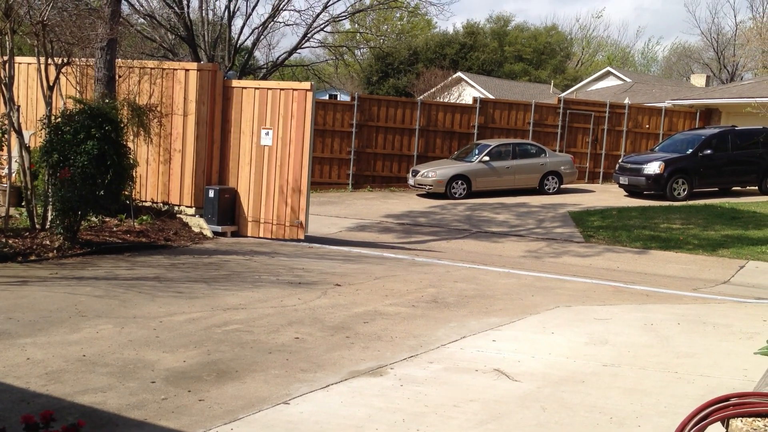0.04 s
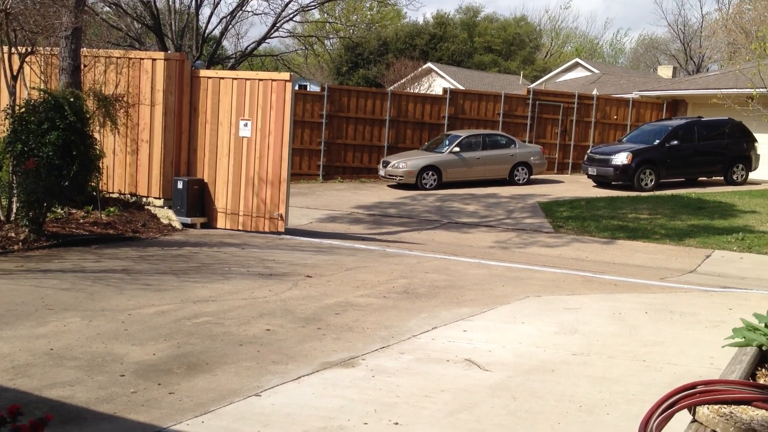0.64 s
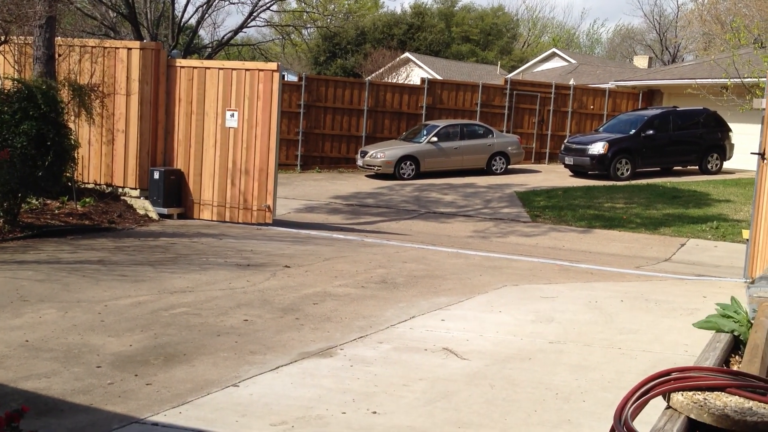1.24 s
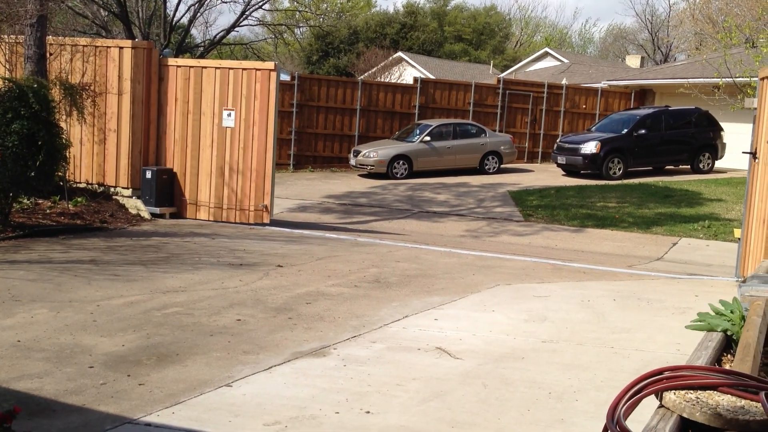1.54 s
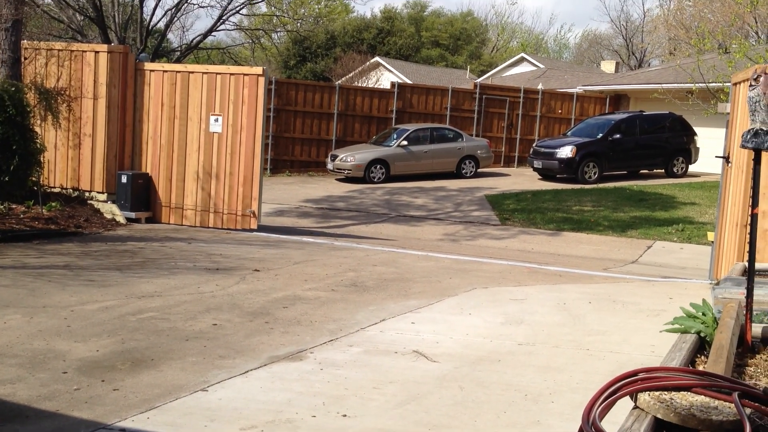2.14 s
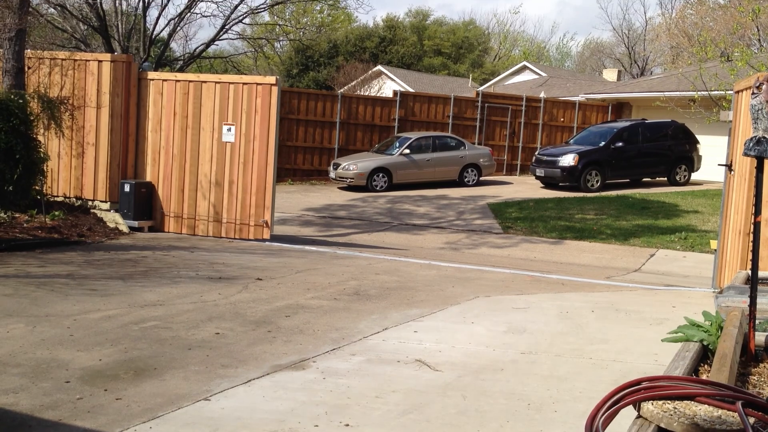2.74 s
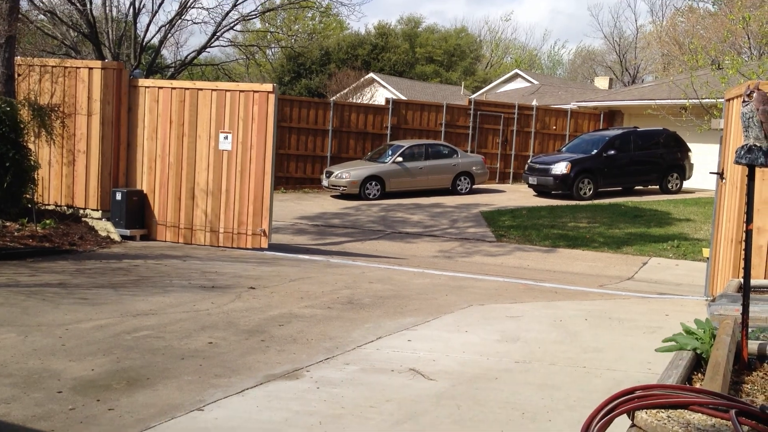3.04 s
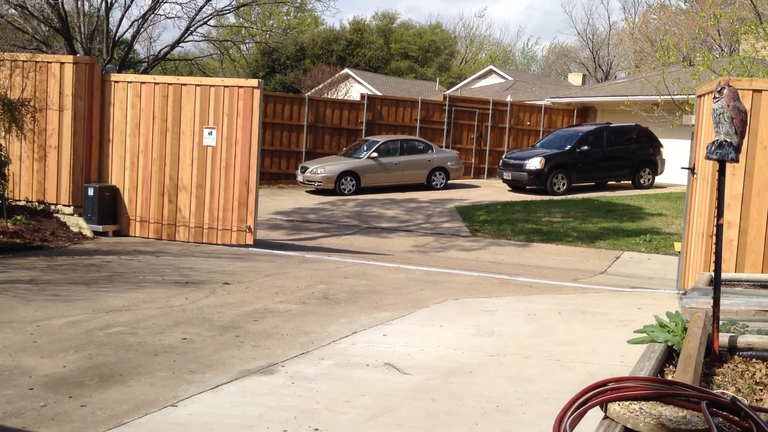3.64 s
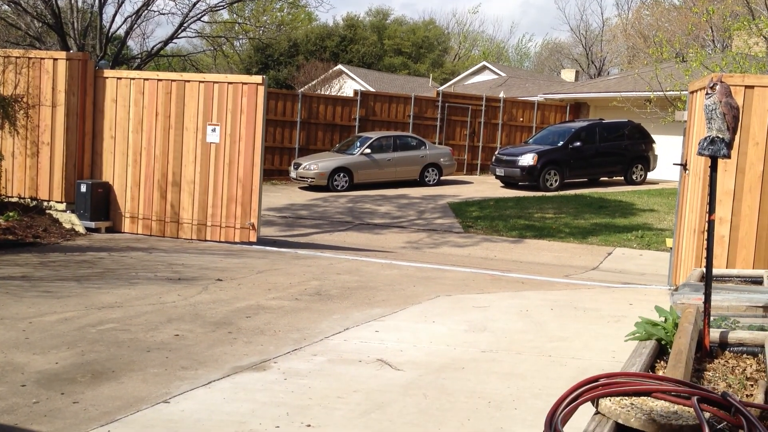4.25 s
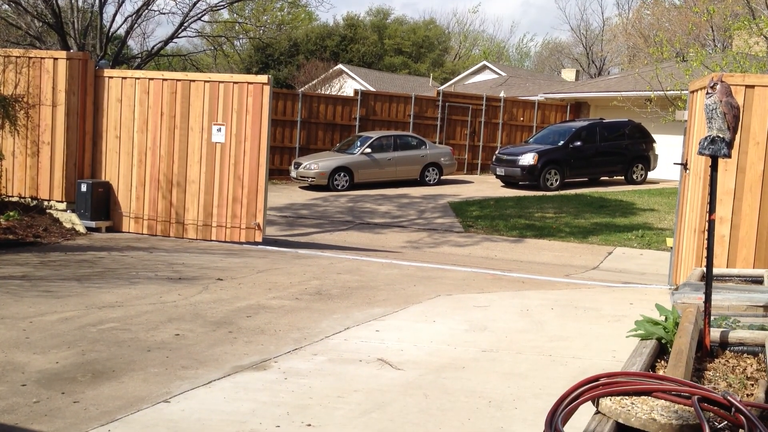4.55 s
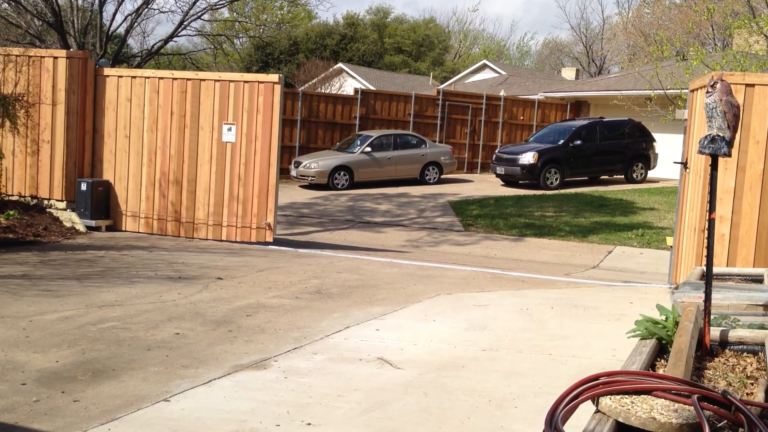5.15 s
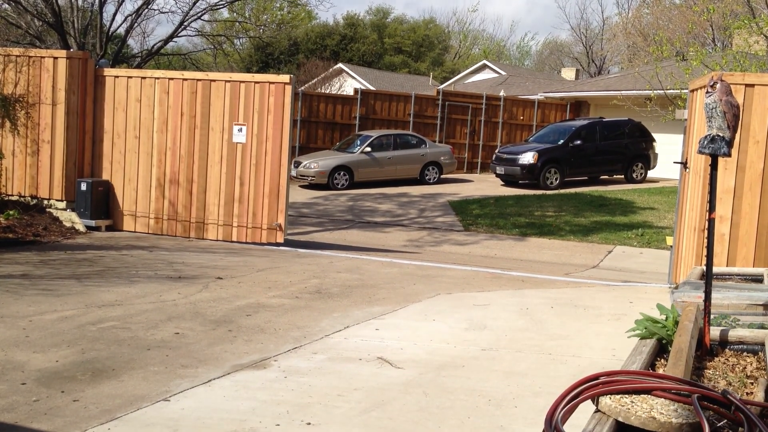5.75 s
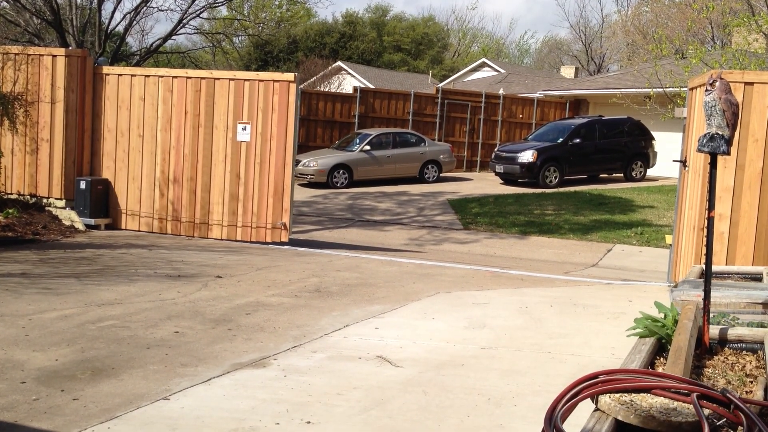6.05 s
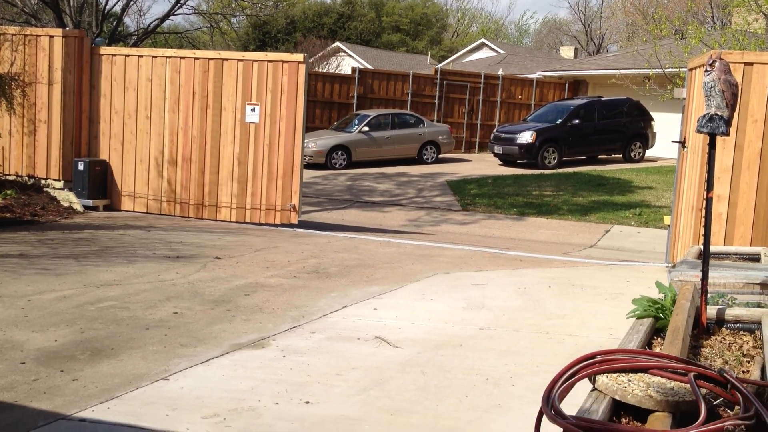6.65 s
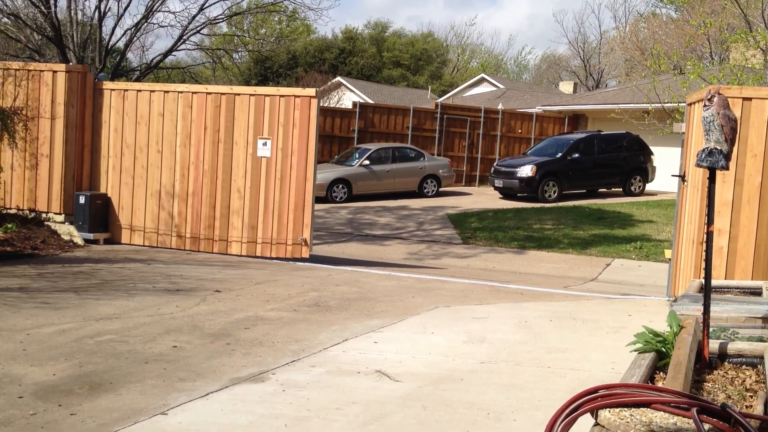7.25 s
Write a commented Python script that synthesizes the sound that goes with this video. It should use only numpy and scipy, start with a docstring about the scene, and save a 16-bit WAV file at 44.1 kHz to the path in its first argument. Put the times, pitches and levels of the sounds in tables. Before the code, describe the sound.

Wind gusts on the microphone with low thuds, then eases over distant traffic, a faint gate motor hum and small birds.

```python
"""Breeze in a driveway

Turbulent air rings the microphone port: first a gust with thuds and pops, then lighter puffs.
Beneath it a wooden gate's motor hums some way off, small birds whistle and chip, and light ticks
sound close by. Distant traffic and a fine hiss form the background. Fences and walls scatter short
echoes, and a gain control turns everything down under the gust."""
import sys
import numpy as np
from scipy import signal
from scipy.fft import rfft, irfft
from scipy.io import wavfile
from scipy.ndimage import uniform_filter1d, minimum_filter1d

SR = 44100
rng = np.random.default_rng(int(sys.argv[2]) if len(sys.argv) > 2 else 0)


def dump(signal):
    """Clip the signal to [-1, 1] and save it as 16-bit WAV at the path in sys.argv[1]."""
    limited = np.clip(np.atleast_2d(signal).T, -1, 1)
    pcm = np.round(limited * 32767).astype(np.int16)
    wavfile.write(sys.argv[1], SR, pcm)


N = 321930

# Push of the wind, two surges, a lull and two light swells: t/s, level/dB
GUST_ENVELOPE = [(0, -42), (.05, -30.5), (.15, -29), (.2, -20.5), (.33, -21.5), (.44, -27), (.57, -29),
                 (.7, -13.5), (.86, -13.5), (1.3, -29.5), (1.41, -50.5), (1.85, -43.5), (2.4, -52.5),
                 (3.95, -48.5), (4.28, -34.5), (4.75, -53.5), (5.4, -37.5), (6.25, -39), (7.3, -50)]
# Spectra of the port's low thud, of light air and of hard eddies' flutter: f/Hz, relative level/dB
THUD_SPECTRUM = [(20, -40), (45, -38), (65, -18.5), (90, -13.5), (130, -0.5), (160, 2.5), (220, 0),
                 (310, -4.5), (420, -13), (600, -27.5), (1000, -48), (2500, -76), (8000, -100)]
LIGHT_AIR_SPECTRUM = [(25, -39.5), (45, -37.5), (70, -14.5), (100, -8), (150, 2.5), (200, -2.5),
                      (280, -11.5), (400, -17.5), (700, -30.5), (4000, -79)]
FLUTTER_SPECTRUM = [(150, -27), (300, 2.5), (530, -1), (700, -7), (1000, -16.5), (1500, -29), (2200, -35.5),
                    (4000, -50), (9000, -78.5)]


def wind(gust_db=-1.5, flutter_db=-11.5, brighten=2.26, lumps_db=1.72, lumps_hz=22, crossover_db=-30):
    """Turbulent pressure fluctuations rumble, deeper in light air; flutter grows fastest in a gust."""
    push_db = curve(GUST_ENVELOPE)
    hard_share = 1 / (1 + amp(crossover_db - push_db) ** 2)
    rumble = np.sqrt(hard_share) * noise(THUD_SPECTRUM)
    rumble += np.sqrt(1 - hard_share) * noise(LIGHT_AIR_SPECTRUM)
    peak_db = push_db.max()
    flutter = amp(peak_db + flutter_db + brighten * (push_db - peak_db)) * noise(FLUTTER_SPECTRUM)
    trailing_air = wakes()
    lumps = amp(lumps_db * narrow(0, lumps_hz))  # small eddies modulate the level
    return (amp(push_db + gust_db) * rumble + flutter + trailing_air) * lumps


# Distinct eddies striking the microphone: t/s, relative level/dB, nominal length/s
EDDIES = [(0.081, -18, 0.015), (0.218, -10, 0.0081), (.263, -15, 0.0051), (.3, -12, 0.018),
          (.395, -16, 0.0081), (0.493, -9, 0.0085), (0.515, -7.5, .013), (.623, -7.5, 0.014),
          (0.721, -7, .014), (0.778, -5, 0.021), (.823, -9.5, 0.0093), (.89, -11, 0.015),
          (0.992, -11, 0.01), (1.122, -16, 0.011), (1.277, -15.5, 0.011), (2.958, -33, .02),
          (3.07, -32, 0.018), (3.493, -31, 0.0093), (3.69, -33, .022), (4.265, -29, 0.026),
          (4.885, -24.5, 0.0068), (4.935, -29, 0.0091), (5.36, -20, .018), (5.699, -26.5, 0.0098),
          (5.835, -27.5, 0.0053), (5.884, -26, 0.0055), (6.075, -27, 0.017), (6.186, -26, 0.011),
          (6.242, -28.5, 0.016), (6.43, -29.5, .01)]


def buffets(thud_db=-2.5, flutter_db=-20.5, octaves_per_db=0.0086, harden=0.53, size=8192):
    """Eddy impact gives a thud and a briefer flutter; the harder it is, the higher and rougher."""
    out = np.zeros(N)
    for s, db, length in EDDIES:
        force_db = db + 22  # relative to a middling eddy
        thud = eddy(1.246 * length, THUD_SPECTRUM, pitch=2 ** (octaves_per_db * force_db))
        flutter = amp(flutter_db + harden * force_db) * eddy(0.75 * length, FLUTTER_SPECTRUM, port=.2)
        add(out, s - size / 2 / SR, amp(db) * (amp(thud_db) * thud + flutter))
    return out


def eddy(length, spectrum, pitch=1, port=0.51, size=8192):
    """Forced resonance: a short swirl rings the port; its loudest moment is centred, at rms 1."""
    t = (np.arange(size) - size // 2) / SR
    turbulence = colour(rng.standard_normal(size), np.multiply(spectrum, [pitch, 1]))
    swirl = signal.hilbert(unit(turbulence))
    even_swirl = swirl.real / np.sqrt(abs(swirl) ** 2 + .5)
    blow = colour(even_swirl * np.exp(-2 * (t / length) ** 2), np.multiply(spectrum, [pitch, port]))
    window = np.hanning(600)
    power = signal.fftconvolve(abs(signal.hilbert(blow)) ** 2 / 2, window / window.sum(), "same")
    return np.roll(blow, size // 2 - power.argmax()) / np.sqrt(power.max())


def wakes(wake_db=-14, decay_s=0.041, cap_db=-36):
    """The turbulent wake behind each eddy decays exponentially."""
    t = np.arange(SR // 2) / SR
    envelope = np.zeros(N)
    for s, db, _ in EDDIES:
        add(envelope, s, amp(min(db + wake_db, cap_db)) * np.exp(-t / decay_s))
    return envelope * noise(LIGHT_AIR_SPECTRUM)


# Pops at the port: t/s, level/dB, tilt/(dB per octave), decay/s
POP_EVENTS = [(.2195, -12.5, -3, 0.0013), (.2885, -21, -0.5, 0.0012), (.5215, -18, -4.5, .0025),
              (.7845, -22.5, 0, 0.0012), (.82, -16, -8, 0.0013)]
# Spectrum of a pop: f/Hz, relative level/dB
POP_SPECTRUM = [(150, -22), (450, 7.5), (1200, -2.5), (2000, -18.5), (3000, -32.5), (8000, -65.5)]


def pops():
    """Pressure transients arise as the hardest eddies break on the port."""
    return bursts(POP_EVENTS, POP_SPECTRUM, rise_s=0.0015)


def gate_motor(hz=232.9, hum_db=-50.3, wander=0.0019, wander_hz=8, drone_db=-55, half_width_hz=9):
    """Periodic vibration gives one slightly wandering line, in a rough narrow-band drone."""
    cycles = np.cumsum(hz * (1 + wander * narrow(0, wander_hz))) / SR
    hum = amp(hum_db) * np.sqrt(2) * np.sin(2 * np.pi * cycles)
    return hum + amp(drone_db) * narrow(hz, half_width_hz)


# Bird notes: t/s, length/s, start f/Hz, end f/Hz, level/dB, warble as a fraction of f
BIRD_NOTES = [(.505, .037, 3530, 3560, -63, .004), (1.05, .02, 5660, 7850, -55, 0.016),
              (1.828, .045, 3400, 3460, -63, .003), (2.194, .065, 3360, 3520, -56.5, 0.0052),
              (2.586, .085, 3250, 3450, -55.5, .003), (2.76, .09, 4580, 4480, -60, .03),
              (4.29, .025, 3350, 3240, -60, .01), (4.637, .04, 3220, 3180, -60, .033),
              (4.66, .047, 2850, 2780, -60, .02), (4.952, 0.065, 2990, 2950, -60, .02)]


def bird_whistles(bend=6.2, warble_hz=250, skew=0.47):
    """Frequency modulation: each thin note starts briskly, glides, levels off and fades; some warble."""
    out, quiver = np.zeros(N), narrow(0, warble_hz)
    for s, length, start_hz, end_hz, db, warble in BIRD_NOTES:
        progress = np.linspace(0, 1, round(length * SR))
        glide_hz = end_hz + (start_hz - end_hz) * (1 - progress) ** bend
        hz = glide_hz * (1 + warble * quiver[round(s * SR):][:len(progress)])
        envelope = amp(db) * np.sin(np.pi * progress ** skew)
        add(out, s, envelope * np.sqrt(2) * np.sin(2 * np.pi * np.cumsum(hz) / SR))
    return out


# Bird chips: t/s, level/dB, tilt/(dB per octave), decay/s
CHIP_EVENTS = [(1.343, -56.5, 0, .012), (2.025, -51.5, 0, 0.012), (2.947, -50.5, 5, 0.0097),
               (3.464, -52, 7, 0.0062), (4.104, -51, -4, 0.014), (5.005, -47, -4.5, 0.012)]
# Spectrum of a chip: f/Hz, relative level/dB
CHIP_SPECTRUM = [(1800, -45), (2700, -8), (3200, 1.5), (4700, 0.5), (5400, -9.5), (6200, -0.5), (7000, -7),
                 (8000, -2), (9000, -12), (10000, -20), (14000, -30)]


def bird_chips():
    """Brief calls spread over a wide band are heard as dry chips with no clear pitch."""
    return bursts(CHIP_EVENTS, CHIP_SPECTRUM, rise_s=0.0041)


# Light ticks: t/s, level/dB, tilt/(dB per octave), decay/s
TICK_EVENTS = [(2.4463, -45, 0, .0004), (2.4488, -48, -4, .0005), (2.4501, -30, -1, 0.00033),
               (3.0985, -51, 16, .004), (3.0055, -60, 15, .002), (3.168, -61, 13, .003),
               (3.952, -57, 17, .002), (6.0725, -56, 1, .003)]
# Spectrum of a tick: f/Hz, relative level/dB
TICK_SPECTRUM = [(2000, -33), (3100, 2), (6500, -3), (8500, -4), (10000, -14), (15000, -20)]


def ticks():
    """Treble transients of a few milliseconds or less are heard as light ticks."""
    return bursts(TICK_EVENTS, TICK_SPECTRUM, rise_s=0.00038)


# Spectrum of distant traffic and leaves: f/Hz, relative level/dB
TRAFFIC_SPECTRUM = [(45, -33), (90, -5), (200, 5.5), (350, -0.5), (480, 0.5), (650, -2.5), (1000, 1.5),
                    (1250, 2), (1650, -4.5), (2000, -6), (2800, -16.5), (4000, -21.5), (4900, -22),
                    (5300, -32), (9000, -49.5)]
# Tones of tyres on a far road: f/Hz, bandwidth/Hz, level/dB
TYRE_TONES = [(1220, 41, -57.5), (1402, 44, -57)]
# Gain of those tones as the tyres near and recede: t/s, gain/dB
TYRE_APPROACH = [(0, 1), (4.2, -15), (4.7, 0), (5.6, -3.5), (6.6, 3), (7.3, 0.5)]


def traffic(wash_db=-43, waver_db=0.78, waver_hz=6):
    """Far incoherent sources sum to a wavering wash, over which tyres sing in narrow bands."""
    wash = amp(wash_db + waver_db * narrow(0, waver_hz)) * noise(TRAFFIC_SPECTRUM)
    tyres = sum(amp(db) * narrow(hz, width / 2) for hz, width, db in TYRE_TONES)
    return wash + amp(curve(TYRE_APPROACH)) * tyres


# Spectrum of the fine hiss: f/Hz, relative level/dB
HISS_SPECTRUM = [(2000, -6.5), (5300, -0.5), (6300, 2), (8300, 0.5), (9200, -3.5), (9900, -9), (12000, -6),
                 (15300, -9)]
# Slow drift of the hiss: t/s, level/dB
HISS_ENVELOPE = [(0, -63), (.9, -64.5), (2.9, -64.5), (3.33, -63), (4.1, -66), (7.3, -65.5)]


def hiss():
    """Faint broadband noise sets the floor in the treble."""
    return amp(curve(HISS_ENVELOPE)) * noise(HISS_SPECTRUM)


def yard_echo(x, wet_db, t60, size=16384):
    """Scattering from fences and house walls adds sparse reflections that fall 60 dB in t60 seconds."""
    t = np.arange(size) / SR
    taps = rng.standard_normal(size) * (rng.random(size) < .04)
    taps *= (t > .004) * amp(-60 * t / t60)
    return x + amp(wet_db) * signal.fftconvolve(x, taps / np.linalg.norm(taps))[:N]


def bursts(rows, spectrum, rise_s, size=8192):
    """Damped transients: coloured noise rises quickly and decays exponentially."""
    out = np.zeros(N)
    t = np.maximum(np.arange(size) - size // 2, 0) / SR
    for s, db, tilt, decay in rows:
        envelope = (1 - np.exp(-t / rise_s)) * np.exp(-t / decay)
        tilted = [(hz, level + tilt * np.log2(hz)) for hz, level in spectrum]
        burst = colour(rng.standard_normal(size) * envelope, tilted)
        burst *= np.linalg.norm(envelope / envelope.max()) / np.linalg.norm(burst)
        add(out, s - size / 2 / SR, amp(db) * burst)
    return out


def amp(db):
    """Amplitude ratio of a level in decibels."""
    return 10 ** (np.asarray(db) / 20)


def unit(x):
    """Normalisation to rms 1."""
    return x / np.sqrt(np.mean(x ** 2) + 1e-20)


def curve(rows):
    """Linear interpolation of (t/s, level/dB) points."""
    return np.interp(np.arange(N) / SR, *np.transpose(rows))


def colour(x, spectrum):
    """Linear filtering by a spectrum of (f/Hz, level/dB) points."""
    hz, db = np.transpose(spectrum)
    f = np.fft.rfftfreq(len(x), 1 / SR)
    return irfft(rfft(x) * amp(np.interp(np.log(f + 1), np.log(hz), db)), len(x))


def noise(spectrum):
    """Stationary coloured noise of rms 1."""
    return unit(colour(rng.standard_normal(N), spectrum))


def narrow(hz, half_width_hz):
    """Noise in one narrow resonance; at 0 Hz it is a slow random drift."""
    f = np.fft.rfftfreq(N, 1 / SR)
    return unit(irfft(rfft(rng.standard_normal(N)) / (1 + ((f - hz) / half_width_hz) ** 2), N))


def add(mix, s, sound):
    """Superposition of a sound on the mix, starting at s seconds."""
    start = round(s * SR)
    sound = sound[max(-start, 0):]
    part = mix[max(start, 0):][:len(sound)]
    part += sound[:len(part)]


def gain_control(x, threshold_db=-21.5, cut_per_db=0.49, sense_s=0.41, recover_db_per_s=2):
    """Compression: the gain falls under sustained loud sound and recovers slowly."""
    pole = np.exp(-1 / (sense_s * SR))
    power_db = 10 * np.log10(signal.lfilter([1 - pole], [1, -pole], x ** 2) + 1e-12)
    cut_db = cut_per_db * np.maximum(power_db - threshold_db, 0)
    recovery_db = recover_db_per_s * np.arange(N) / SR
    return x * amp(recovery_db - np.maximum.accumulate(cut_db + recovery_db, axis=-1))


def scene():
    """Superposition: the pressures of all sources add at one microphone."""
    birds = yard_echo(bird_whistles(), wet_db=-8.5, t60=0.41)
    birds += yard_echo(bird_chips(), wet_db=-6, t60=0.17)
    close_ticks = ticks()
    background = yard_echo(traffic() + hiss(), wet_db=-15, t60=0.098)  # near walls ripple its spectrum
    air = wind() + buffets() + pops()
    return (air + gate_motor() + birds + close_ticks + background)[None]


def record(dry, ceiling=0.88, smooth_samples=220, cutoff_hz=15300):
    """Slow compression, fast peak limiting of the hardest eddies, then low-pass filtering."""
    compressed = gain_control(dry)
    gain = np.minimum(1, ceiling / (abs(compressed) + 1e-9))
    gain = minimum_filter1d(gain, 2 * smooth_samples)
    gain = uniform_filter1d(uniform_filter1d(gain, smooth_samples), smooth_samples)
    lowpass = signal.firwin(511, cutoff_hz, window=("kaiser", 9), fs=SR)
    return signal.oaconvolve(compressed * gain, lowpass[None], "same")


dry = scene()
out = record(dry)
dump(out)
```